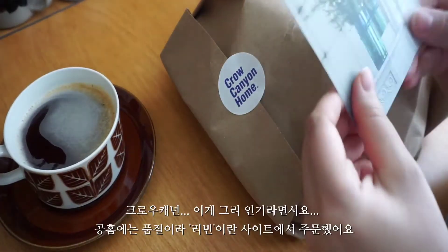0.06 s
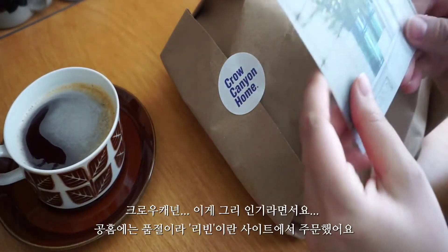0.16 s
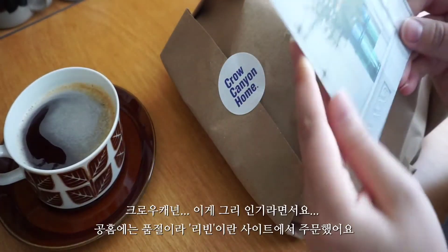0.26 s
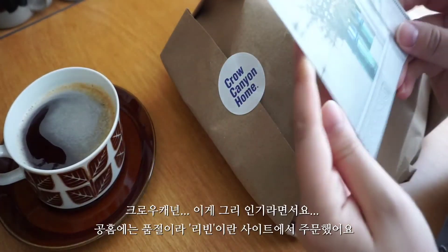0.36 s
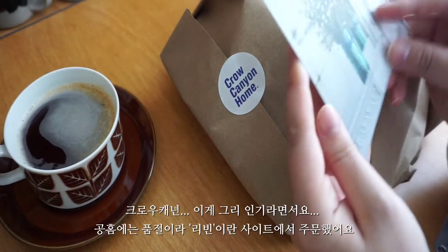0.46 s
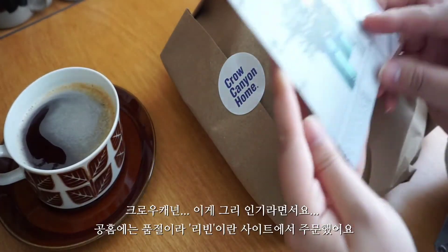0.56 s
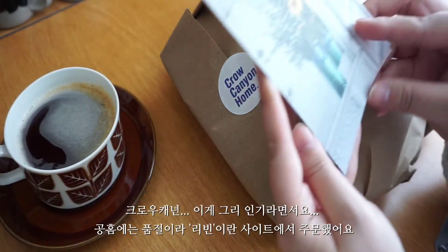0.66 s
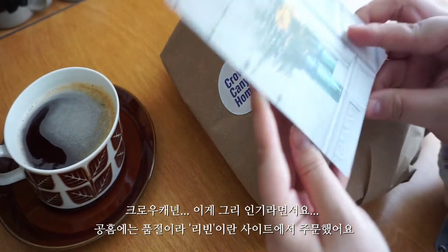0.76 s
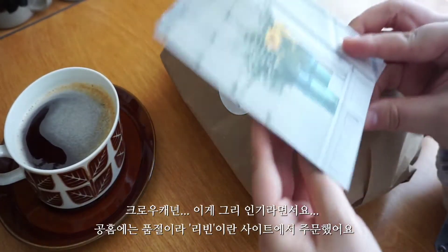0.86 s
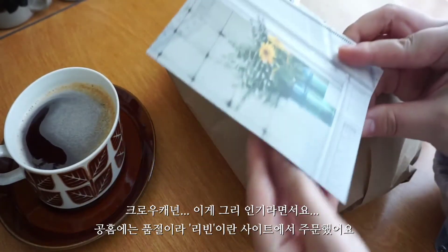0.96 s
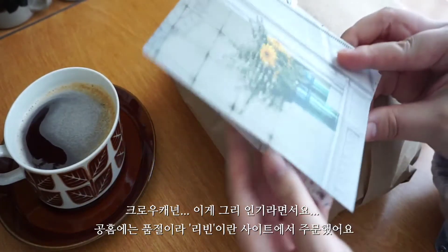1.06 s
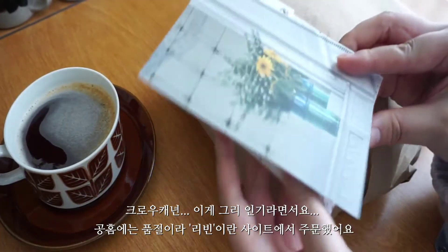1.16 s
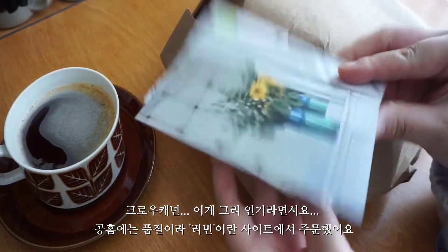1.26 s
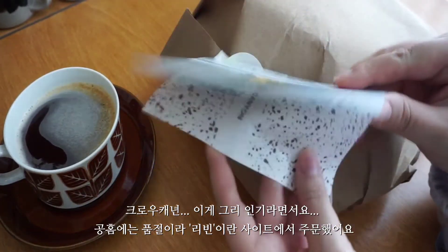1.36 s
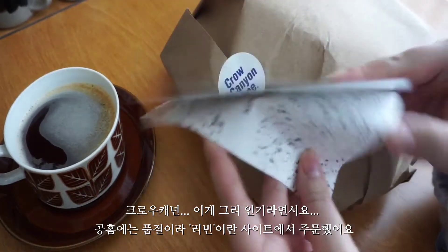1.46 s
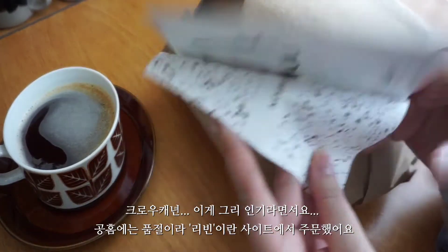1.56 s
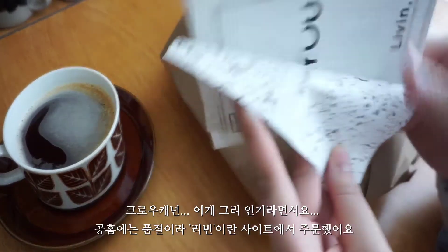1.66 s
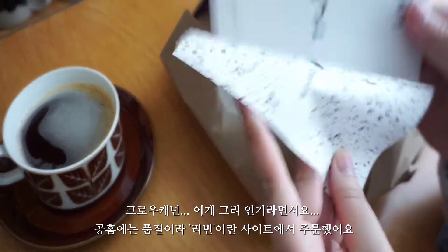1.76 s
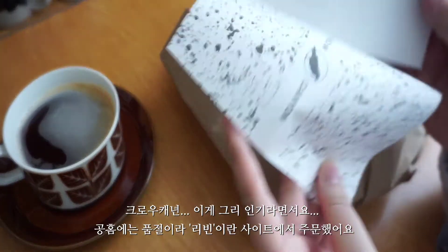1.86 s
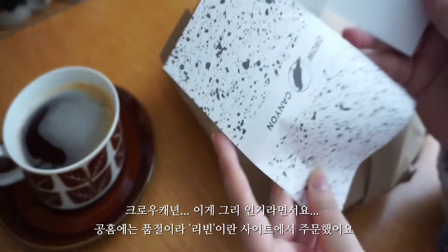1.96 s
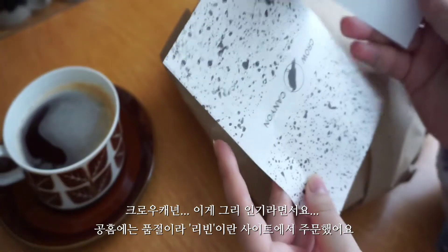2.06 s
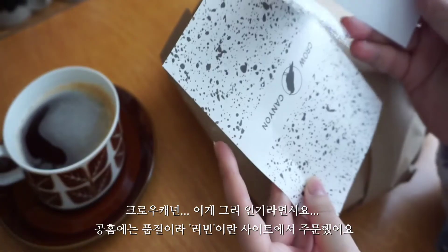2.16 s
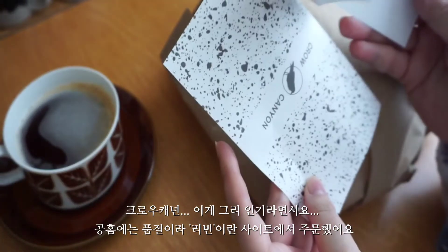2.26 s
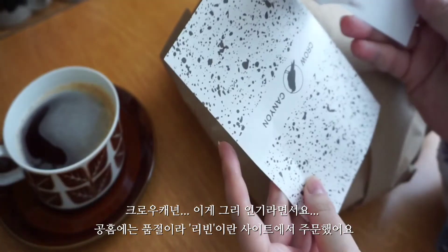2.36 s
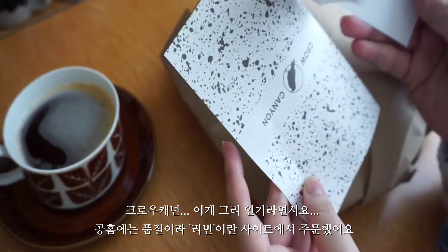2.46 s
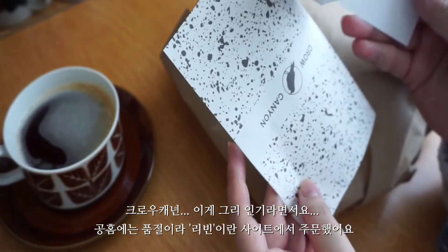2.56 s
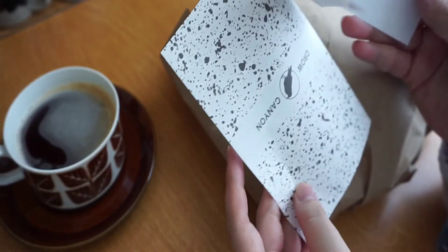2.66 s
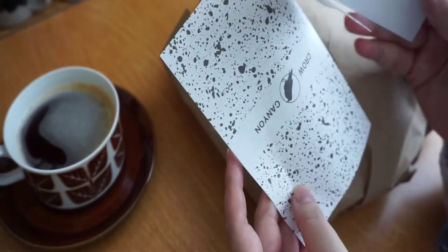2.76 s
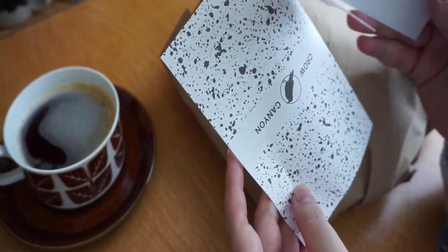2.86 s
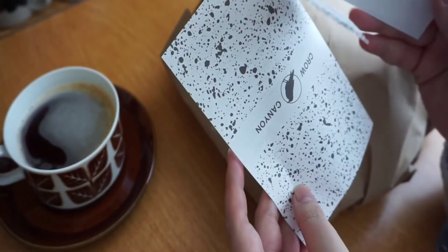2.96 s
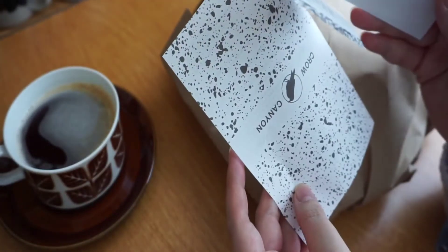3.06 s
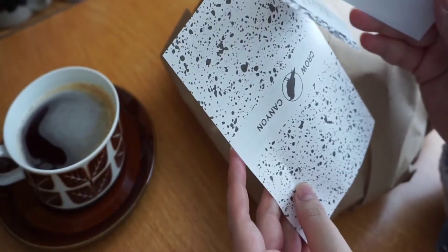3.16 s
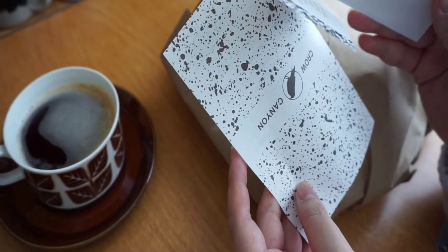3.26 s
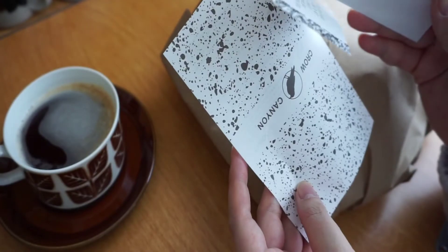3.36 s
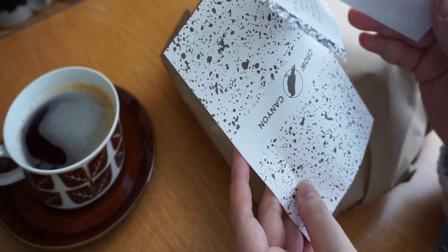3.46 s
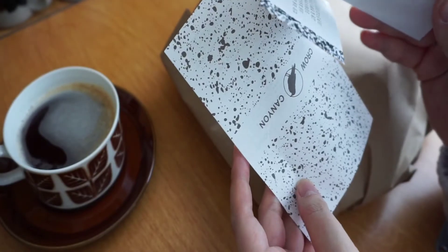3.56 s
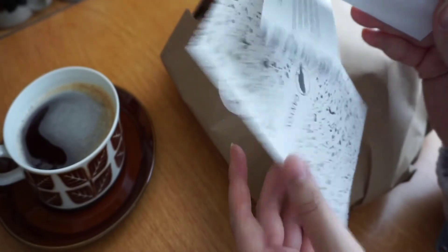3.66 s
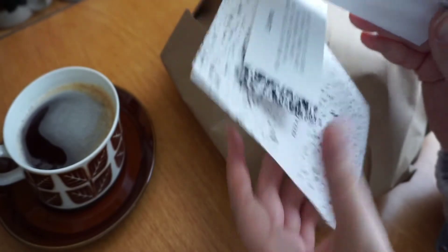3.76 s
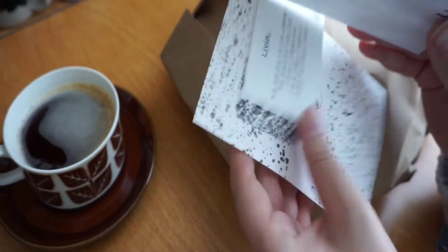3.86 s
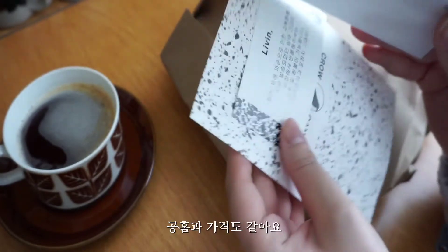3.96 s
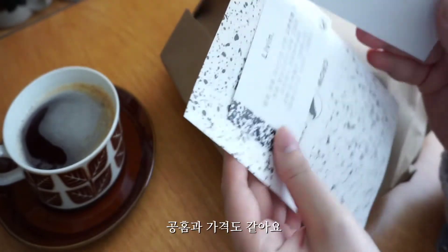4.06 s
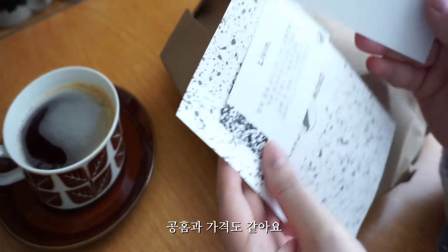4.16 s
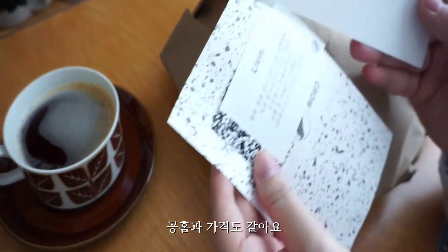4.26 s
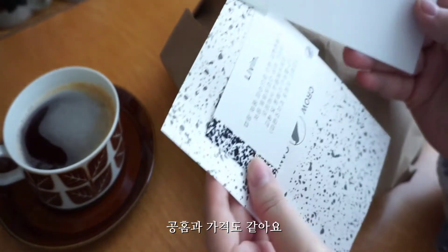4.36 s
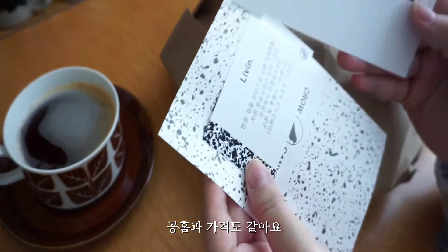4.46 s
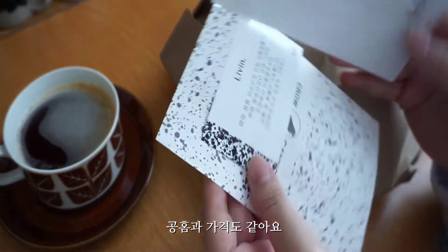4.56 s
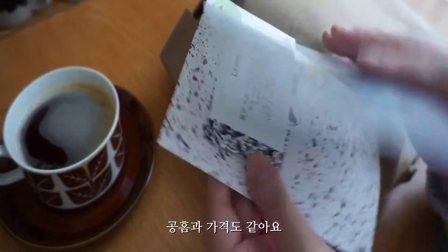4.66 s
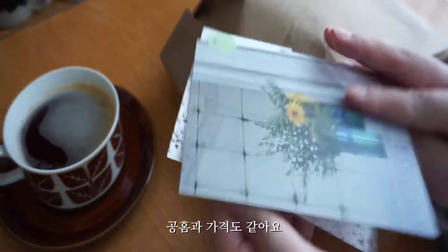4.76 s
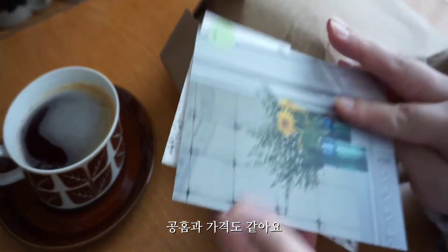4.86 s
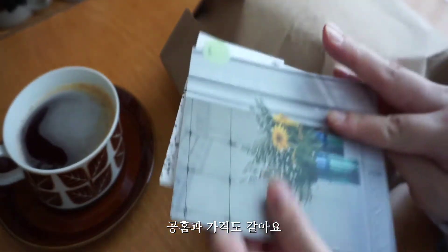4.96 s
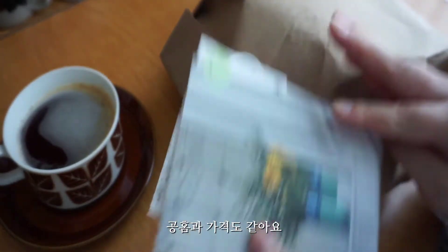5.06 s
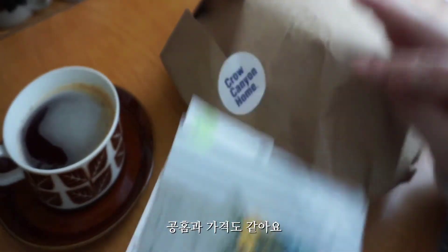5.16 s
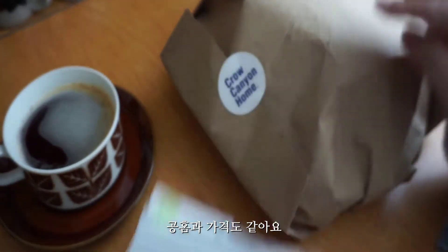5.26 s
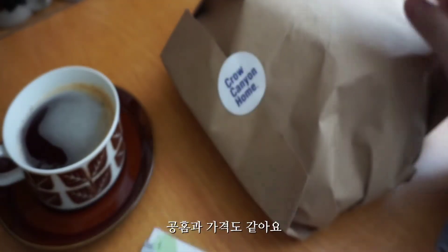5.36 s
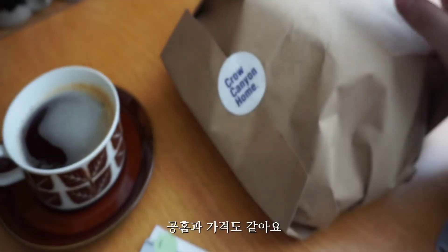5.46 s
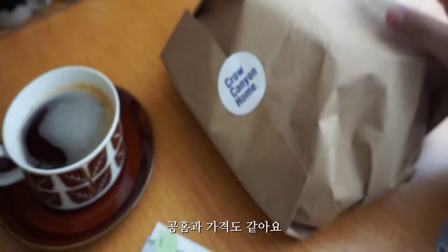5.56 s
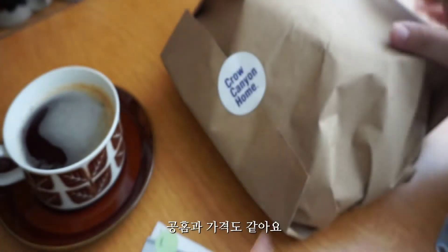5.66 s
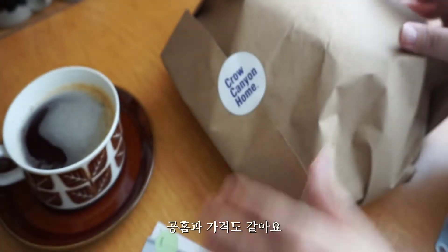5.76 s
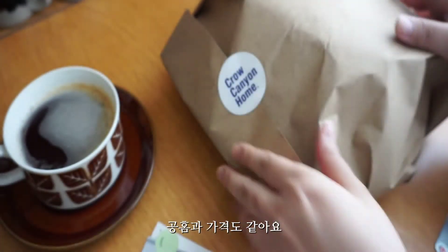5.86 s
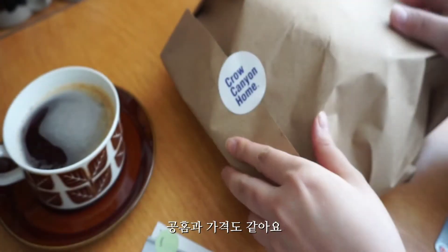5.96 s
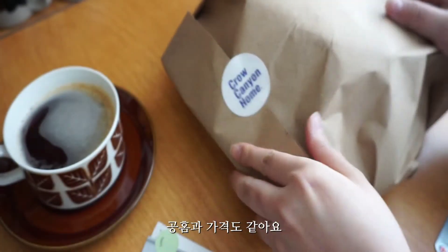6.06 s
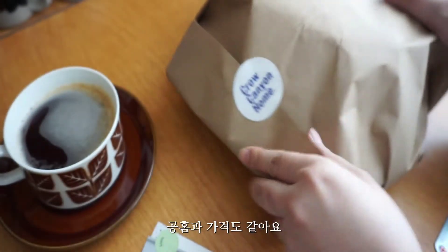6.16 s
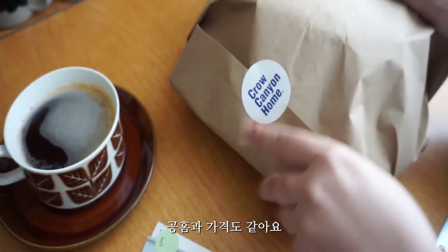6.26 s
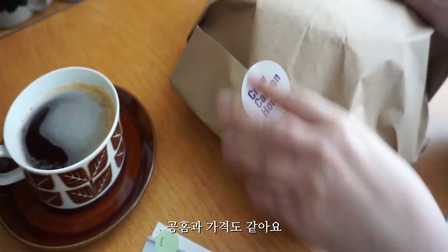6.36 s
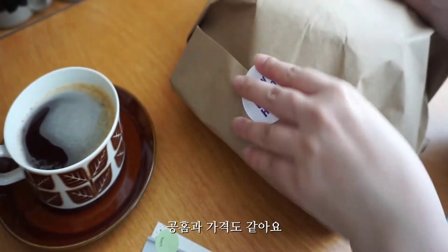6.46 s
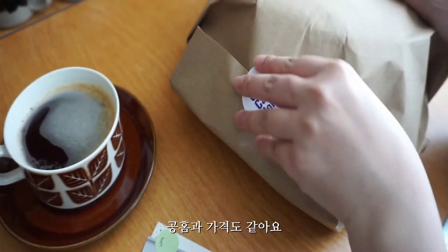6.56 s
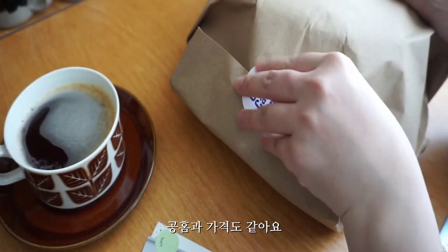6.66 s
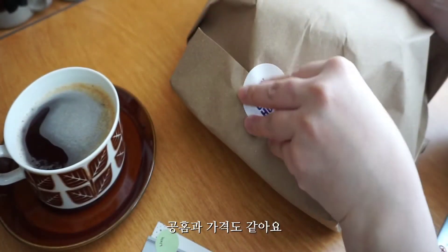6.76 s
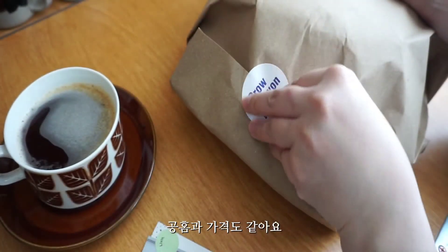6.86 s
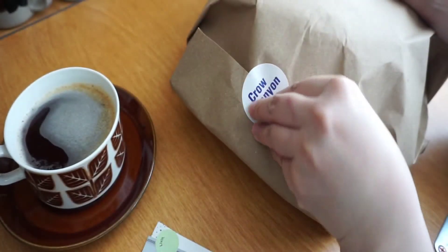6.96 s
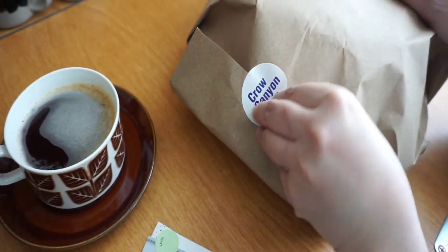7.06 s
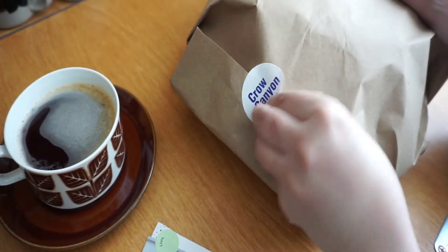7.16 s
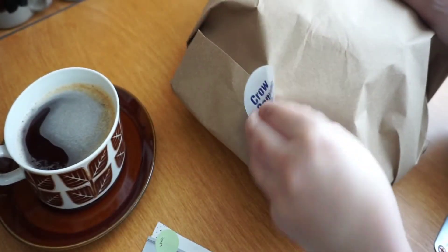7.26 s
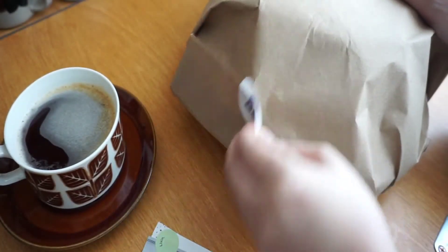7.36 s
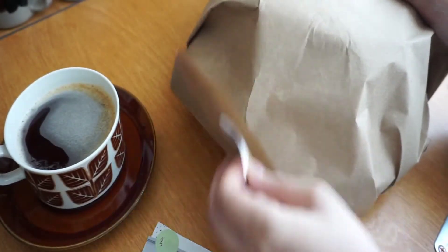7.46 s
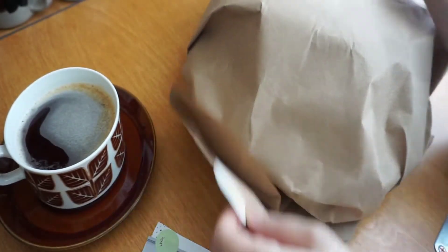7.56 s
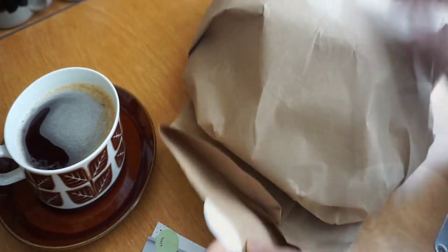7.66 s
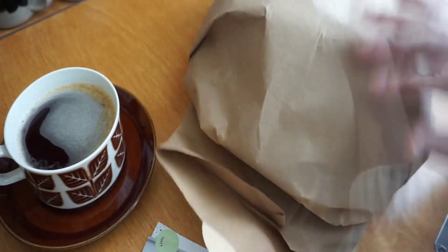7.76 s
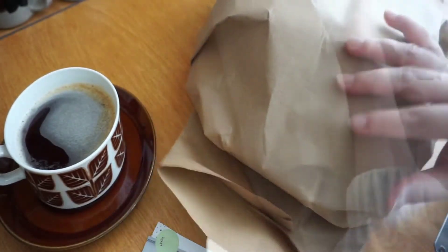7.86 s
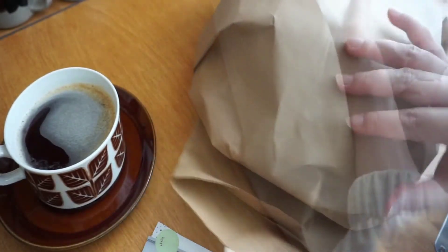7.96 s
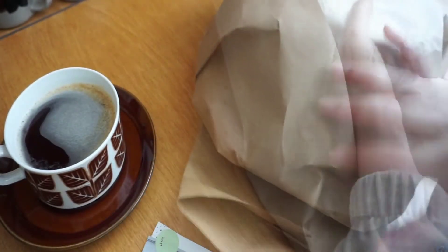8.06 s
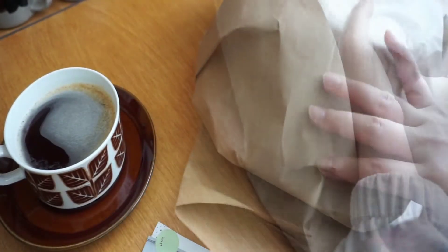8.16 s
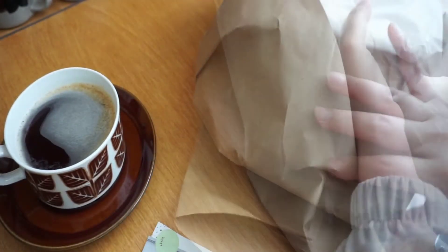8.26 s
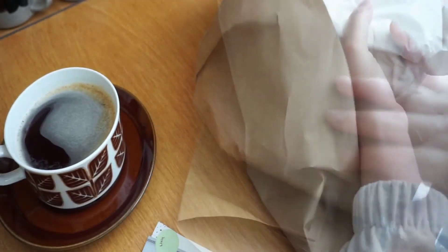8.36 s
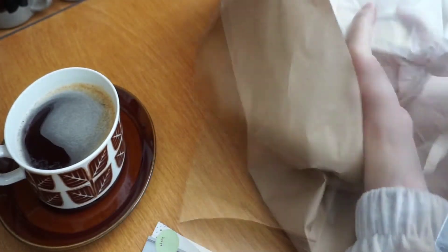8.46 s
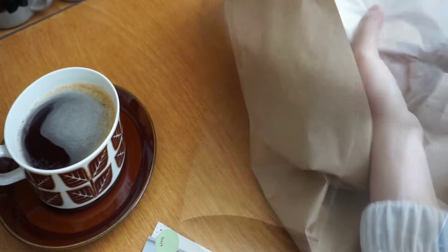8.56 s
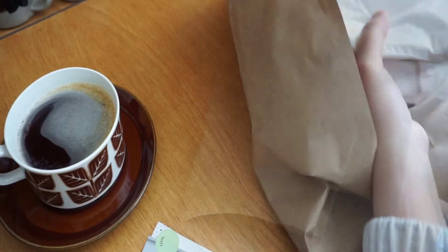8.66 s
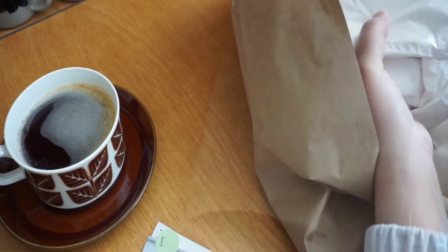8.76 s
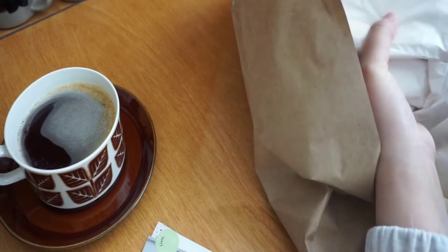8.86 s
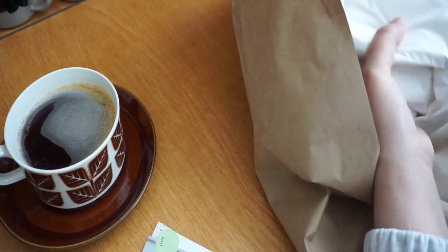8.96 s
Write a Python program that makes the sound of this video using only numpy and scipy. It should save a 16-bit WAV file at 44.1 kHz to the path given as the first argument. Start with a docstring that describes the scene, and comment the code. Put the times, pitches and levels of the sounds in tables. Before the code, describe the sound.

Stiff cards slide and flick in someone's hands, then a sticker is peeled off a crackling paper bag that is pulled open.

```python
"""Stiff cards flick and hiss as hands shuffle them at a table in a small quiet room: their faces rub
as they slide, their edges click as they slip. Then the hands peel the sticker off a paper bag and
pull it open. The bag crackles, its creases snap and its panels pop over the air inside.
A camera's two microphones hear it close up, from just above the table."""
import sys
import numpy as np
from scipy import signal
from scipy.fft import rfft, irfft
from scipy.io import wavfile
from scipy.ndimage import uniform_filter1d

SR = 44100
rng = np.random.default_rng(int(sys.argv[2]) if len(sys.argv) > 2 else 0)


def waveform_to_disk(signal):
    """Save audio, clipped to [-1, 1], as 16-bit WAV at the path in sys.argv[1]."""
    frames = np.transpose(np.atleast_2d(signal))
    scaled = np.clip(frames, -1, 1) * 32767
    samples = np.round(scaled).astype(np.int16)
    wavfile.write(sys.argv[1], SR, samples)


N = 396900  # 9 s
HAND_CLOCK = np.arange(0, N, 64)  # hand movements are slow: one point every 64 samples


def amp(db):
    """Decibels to gain."""
    return 10 ** (np.asarray(db) / 20)


def unit(x):
    """Scales to rms 1."""
    return x / np.sqrt(np.mean(x ** 2) + 1e-20)


def bins(size):
    """The frequencies of a spectrum, in Hz."""
    return np.fft.rfftfreq(size, 1 / SR)


def read(points, hz):
    """Reads a table on a log-frequency axis."""
    freq_hz, value = np.transpose(points)
    return np.interp(np.log(hz + 1), np.log(freq_hz + 1), value)


def shaped(x, gain):
    """Filters by a gain for each frequency."""
    return irfft(rfft(x) * gain, x.shape[-1])


def causal(db):
    """A response with this colour that rings only after the blow."""
    cepstrum = irfft(db * np.log(10) / 20)
    half = len(cepstrum) // 2
    cepstrum[1:half] *= 2
    cepstrum[half + 1:] = 0
    return np.exp(rfft(cepstrum))


def bump(hz, centre_hz, width_hz):
    """A resonance peak of height 1."""
    return 1 / (1 + (2 * (hz - centre_hz) / width_hz) ** 2)


def colour_of(spectrum, modes, hz):
    """A broad spectrum with its resonances, in dB."""
    return read(spectrum, hz) + sum(db * bump(hz, centre, width) for centre, width, db in modes)


# How alike close paper sounds at the two microphones, 0 to 1: freq_hz, likeness
PAPER_LIKENESS = [(300, 0.96), (1000, 0.68), (3000, 0.46), (9000, 0.21)]
def mic_pair(x, likeness=PAPER_LIKENESS):
    """Two unrelated signals become left and right, alike in the bass."""
    shared, separate = rfft(x)
    same = read(likeness, bins(x.shape[1]))
    left = same * shared + np.sqrt(1 - same ** 2) * separate
    return irfft(np.array([left, shared]), x.shape[1])


# Still air in the room, giving way to microphone hiss in the treble: freq_hz, level_db
ROOM_TONE_SPECTRUM = [(13, -53), (22, -35), (48, 4), (81, -8), (139, -5), (163, -11), (253, -3.5),
                      (346, -12), (461, -10), (498, -14), (11000, -27.5), (14300, -90), (22000, -120)]
# Both microphones share the air, but each has its own hiss: freq_hz, likeness
ROOM_TONE_LIKENESS = [(80, 0.95), (250, 0.59), (700, 0)]
def room_tone(air_db=-56.5, drone_hz=58.7, drone_width_hz=12, drone_db=-66):
    """Still room air, a low drone from the building and microphone hiss."""
    hz = bins(N)
    noise = mic_pair(rng.standard_normal((2, N)), ROOM_TONE_LIKENESS)
    air = unit(shaped(noise, amp(read(ROOM_TONE_SPECTRUM, hz))))
    drone = unit(shaped(rng.standard_normal(N), bump(hz, drone_hz, drone_width_hz) ** 2))
    return amp(air_db) * air + amp(drone_db) * drone


# The small room's decay, heard from the table: freq_hz, t60_s
ROOM_DECAY = [(150, 0.66), (1000, 0.51), (4000, 0.26), (10000, 0.42)]
def room_echo(x, early_db=-15.5, early_s=0.004, tail_db=-13, tail_rise_s=0.0089):
    """Table and body throw the sound back at once; the walls add a short tail."""
    t = np.arange(SR * 3 // 4) / SR
    hz, frame_s, noise = signal.stft(rng.standard_normal((2, len(t))), SR, nperseg=256)
    decay = amp(-60 * frame_s / read(ROOM_DECAY, hz)[:, None])
    tail = signal.istft(noise * decay, SR, nperseg=256)[1][:, :len(t)]
    tail *= np.clip(t / tail_rise_s, 0, 1)
    early = rng.standard_normal(tail.shape) * (rng.random(tail.shape) < .06)  # sparse reflections
    early *= (t > .004) * np.exp(-t / early_s)
    echo = mic_pair(amp(tail_db) * unit(tail) + amp(early_db) * unit(early)) / np.sqrt(len(t))
    return signal.fftconvolve(x, echo, axes=1)[:, :N]


def friction(patchy_db=2.5, judder_db=1.5):
    """Fibres drag over fibres; the contact judders and its colour shifts as the sheet bends."""
    noise = signal.stft(mic_pair(rng.standard_normal((2, N))), nperseg=512)[2]
    patches = uniform_filter1d(rng.standard_normal(noise.shape[1:]), size=7, axis=0)  # across frequency
    patches = unit(uniform_filter1d(patches, size=10, axis=1))  # across time
    judder = unit(uniform_filter1d(rng.standard_normal(noise.shape[2]), size=3))
    contact = amp(patchy_db * patches + judder_db * judder)
    return unit(signal.istft(noise * contact, nperseg=512)[1][:, :N])


def buckle(give_s, flutter_db=-4, first_slip=5.8, flutter_s=0.0071, travel_s=.00012, size=4096):
    """A crease gives in a run of tiny slips; bending waves then flutter through the sheet."""
    t = np.arange(size) / SR
    slips = rng.standard_normal((2, size)) * np.exp(-(t / give_s) ** 2)
    slips[0, 0] = first_slip
    slips /= np.linalg.norm(slips, axis=1, keepdims=True)
    flutter = 0.089 * amp(flutter_db) * rng.standard_normal((2, size))
    flutter *= np.exp(-t / (flutter_s + give_s / 2))
    # bending waves disperse: the treble arrives first; travel_s holds at 1 kHz
    dispersion = np.exp(-4j * np.pi * travel_s * np.sqrt(1000 * bins(size)))
    return shaped(mic_pair(slips + flutter), dispersion)


def crackle(per_s=480, spread_db=4.0, ring_db=13, pitches=32, size=2048):
    """Countless small creases of many pitches give way at random."""
    out, hz = np.zeros((2, N)), bins(size)
    for ring_hz in np.geomspace(250, 9000, pitches):
        blow = buckle(give_s=rng.uniform(0.00012, 0.0022), size=size)
        grain = shaped(blow, causal(ring_db * bump(hz, ring_hz, 0.32 * ring_hz)))
        onsets = rng.random(N) < per_s / pitches / SR
        train = onsets * amp(spread_db * np.minimum(rng.exponential(1, N), 3))
        out += signal.oaconvolve(train[None], unit(grain), axes=1)[:, :N]
    return unit(out)


# Where paper sounds hollow, full and crisp: body_hz, middle_hz, edge_hz
ZONE_CENTRES = [400, 1700, 7000]
def zones(hz):
    """Three overlapping ranges of a paper sound: body, middle, edge."""
    return np.array([read(list(zip(ZONE_CENTRES, row)), hz) for row in np.eye(3)])


def sheet(drive, colour_db, gains):
    """A driven sheet sounds its body, middle and edge, each with its own gain."""
    return sum(gain * unit(shaped(drive, zone * amp(colour_db)))
               for zone, gain in zip(zones(bins(N)), gains))


def snaps(rows, spectrum, modes, ring_db, trim_db, flutter_db, wide_db_per_octave=4.0, size=4096):
    """Each snap rings its own panel; wide panels sound hollow, tight creases crisp."""
    out, hz = np.zeros((2, N + size)), bins(size)
    zone, paper_db = zones(hz), colour_of(spectrum, modes, hz)
    for start_s, level_db, body_db, edge_db, ring_hz, give_s in rows:
        # wide panels, ringing below 1 kHz, pump the air better
        peak_db = ring_db + wide_db_per_octave * np.log2(max(1000 / ring_hz, 1))
        colour_db = paper_db + peak_db * bump(hz, ring_hz, width_hz=0.34 * ring_hz + 40)
        blow = buckle(max(give_s, 1e-4), flutter_db)
        wanted_db = level_db + trim_db + np.array([body_db, 0, edge_db])
        for _ in range(2):  # a range's level is its energy spread over 10 ms
            ranges = shaped(blow[:, None], zone * amp(colour_db))
            power = (ranges ** 2).sum(2).mean(0) / (SR / 100)
            colour_db = colour_db + (wanted_db - 10 * np.log10(power)) @ zone
        start = round(start_s * SR)
        out[:, start:start + size] += shaped(blow, causal(colour_db))
    return out[:, :N]


def stroke(start_s, length_s, effort_db, swell_db, rise_db_per_s=583, fade_db_per_s=385):
    """The power of one hand movement: it sets in, swells or eases, and stops."""
    t = HAND_CLOCK / SR - start_s
    progress = np.clip(t / length_s, 0, 1)
    resting_db = rise_db_per_s * np.maximum(-t, 0) + fade_db_per_s * np.maximum(t - length_s, 0)
    return amp(effort_db + swell_db * (progress - .5) - resting_db) ** 2


def envelope(power):
    """Power on the hand clock to a gain for each sample."""
    return np.interp(np.arange(N), HAND_CLOCK, np.sqrt(power))


# The note of one card on another, level relative to the effort: time_s, pitch_hz, level_db
CARD_NOTE_PATH = [(.6, 2310, 1), (.72, 2160, 3.5), (.84, 2300, -0.5), (.93, 3140, 4.5), (1.05, 2980, 9),
                  (1.3, 2900, -17), (1.5, 2340, 1), (2, 2750, -53), (4.8, 3080, -18), (5.02, 3720, 5.5),
                  (5.1, 3280, 8), (5.2, 3430, -41)]
def card_note(width_hz=950):
    """Friction excites a resonance of the sliding card that shifts with the grip."""
    time_s, *columns = np.transpose(CARD_NOTE_PATH)
    pitch_hz, level_db = [np.interp(np.arange(N) / SR, time_s, column) for column in columns]
    carrier = np.exp(2j * np.pi * np.cumsum(pitch_hz) / SR)
    pole = np.exp(-np.pi * width_hz / SR)
    # shift down, low-pass, shift back: a resonance that follows the pitch
    lowered = friction(patchy_db=0.0) / carrier
    ring = carrier * signal.lfilter([(1 - pole) ** 2], [1, -2 * pole, pole * pole], lowered)
    return amp(level_db) * unit(ring.real)


# The colour of stiff card, close up: freq_hz, level_db
CARD_SPECTRUM = [(53, -5), (90, -13), (326, -8), (572, -10), (1410, -8.5), (2430, -6), (11000, -7),
                 (14300, -121), (22000, -120)]
# A card slides over another or under the fingers; edge is relative to effort:
# start_s, length_s, effort_db, swell_db, edge_db
SLIDE_STROKES = [(0, 0.19, -54.5, -7.5, 8.5), (0.213, 0.18, -66, -6, 14.5), (0.455, 0.15, -64.5, 4, 11.5),
                 (0.627, 0.39, -65, -1, 2), (0.853, 0.12, -49, 5.5, 3.5), (1.025, 0.023, -46.5, 3, 6),
                 (1.093, 0.047, -50, 4, 1), (1.195, 0.16, -55.5, 10, 6), (1.378, 0.058, -39.5, 4.5, 7.5),
                 (1.482, 0.055, -35.5, 1.5, 8), (1.577, 0.089, -41.5, 7, -0.5), (1.717, 0.083, -43, 0.5, 3),
                 (1.919, 0.16, -55.5, -20, 1), (2.128, 0.025, -56, -4, 6.5), (2.71, 0.14, -62, 9.5, 0),
                 (2.867, 0.075, -73, -8, 2), (3.705, 0.25, -61.5, -4.5, 7.5), (3.985, 0.095, -48.5, 1, -8),
                 (4.107, 0.38, -64, -10, 4.5), (4.618, 0.27, -61.5, 21, 8), (4.913, .12, -51, -1, 1),
                 (5.071, 0.034, -40.5, 1.5, 5), (5.16, 0.24, -51.5, -5, -1), (5.468, 0.2, -53, 4.5, 1.5)]
def card_slides(hiss, grains, crackle_share=0.19, holding_db=-88, gentle_db=-60, trim_db=-1):
    """Friction and a little crackle sound through the cards; brisk slides are brighter."""
    powers = np.array([stroke(*row[:4]) for row in SLIDE_STROKES])
    *_, edge_db = np.transpose(SLIDE_STROKES)
    holding = amp(holding_db) ** 2  # fingers merely holding a card
    effort = envelope(powers.sum(0) + holding)
    body = amp(gentle_db) * (effort / amp(gentle_db)) ** 0.49  # gains only part of any further effort
    middle = amp(trim_db) * effort
    edge = amp(trim_db) * envelope(amp(edge_db) ** 2 @ powers + holding)
    drive = np.sqrt(1 - crackle_share) * hiss + np.sqrt(crackle_share) * grains
    return effort * card_note() + sheet(drive, read(CARD_SPECTRUM, bins(N)), (body, middle, edge))


# Resonances of a flicked card: pitch_hz, width_hz, boost_db
FLICK_MODES = [(420, 200, 7), (944, 57, 9.5), (1854, 52, 4.5), (2630, 120, 4.5)]
# A low thump as the sound begins, then card edges flicking near the microphones; body and edge are relative to
# level: # start_s, level_db, body_db, edge_db, ring_hz, give_s
EDGE_FLICKS = [(.004, -37.5, 1, -6.5, 165, 0.0046), (.411, -41.5, -7.5, 0.5, 1030, 0.012),
               (.9134, -31.5, -14, -1, 3130, 0.0016), (1.456, -37.5, -4, -8, 3300, 0.0013),
               (1.6122, -32.5, -5, 9, 4450, 0.0037), (1.6166, -28.5, -5.5, 1.5, 584, 0.0024),
               (1.7645, -38, -10, -8, 2240, 0.00043), (1.7716, -41, -30, 8, 3170, 0.0044),
               (1.818, -39, 2.5, 0, 162, 0.00094), (1.8842, -42.5, 7.5, -2, 144, 0.005),
               (2.166, -47, -5, -8, 5470, .0026), (2.1743, -30, -11, -10.5, 3120, 0.0061),
               (2.752, -57, 5, -16, 900, 0.0065), (3.789, -30.5, -10, 1.5, 2750, 0.0066),
               (3.885, -39, -5.5, -2.5, 2480, 0.0053), (3.9168, -32, -4, -1.5, 436, .0028),
               (3.941, -38, -10, -4, 3930, .002), (3.951, -38.5, -17, -1, 2120, 0.0015),
               (3.992, -41.5, -4, -4, 990, 0.0063), (4.001, -41, -4, -22, 1050, 0.0036),
               (4.038, -39, -5.5, -2, 494, 0.01), (4.0444, -27.5, -13.5, -4.5, 800, 0.00016),
               (4.889, -32, -4.5, 0.5, 610, 0.00042), (4.893, -50.5, 10, -8, 105, 0.0066),
               (4.952, -32.5, -14, -11, 2430, 0.0023), (4.982, -38, -10.5, -5.5, 4020, .004),
               (5.128, -36, -9, -5, 1140, 0.012), (5.298, -38, -6, 3, 4850, 0.0091),
               (5.3752, -34, -5, -2, 1020, 0.0051), (5.467, -37.5, -15, -2, 1700, 0.00021)]
def card_flicks():
    """An edge slips free with a click that rings the card."""
    return snaps(EDGE_FLICKS, CARD_SPECTRUM, FLICK_MODES, ring_db=11.0, trim_db=0.6, flutter_db=-4.0)


def bag_flexing(per_s=45, decay_cycles=0.36, pitches=12, size=2048):
    """Broad panels of the bag flip in and out with dull, quickly damped knocks."""
    out, t = np.zeros(N), np.arange(size) / SR
    for hz in np.geomspace(240, 560, pitches):
        knock = unit(np.sin(2 * np.pi * hz * t) * t * np.exp(-hz * t / decay_cycles))
        flips = (rng.random(N) < per_s / pitches / SR) * rng.uniform(-0.85, 1, N)
        out += signal.oaconvolve(flips, knock)[:N]
    return unit(out)


# The colour of the paper bag, close up: freq_hz, level_db
BAG_SPECTRUM = [(24, -70), (40, -14), (100, -8.5), (136, -8.5), (193, -5), (364, -4.5), (611, -4.5),
                (1640, -11), (2230, -9), (11000, -16), (14300, -112), (22000, -120)]
# Resonances of the air in the bag and its broad panels: pitch_hz, width_hz, boost_db
BAG_MODES = [(138.6, 14, 9.5), (371.4, 32, 7.5), (763, 41, 4), (900, 42, 2.5)]
# Hands press, peel and pull the bag at the table; body and edge are relative to effort:
# start_s, length_s, effort_db, swell_db, body_db, edge_db, crackle_share
PULL_STROKES = [(5.734, 0.32, -51, 13.5, -20, 7.5, 0.07), (5.994, 0.031, -39.5, 0.5, 2, 3, 0.25),
                (6.095, 0.21, -40, 3.5, -4.5, 3, 0.2), (6.317, 0.12, -39, 3.5, -2.5, -0.5, 0.15),
                (6.44, 0.26, -43, 9.5, -7, 0.5, 0.01), (6.673, 0.072, -38, -1.5, -3, -8, 0.4),
                (6.788, 0.047, -42.5, 3.5, -11, -3, 0.13), (6.876, 0.29, -47.5, 6.5, -1.5, -2, 0.28),
                (7.211, 0.087, -38.5, -3.5, -4, -3, 0.4), (7.311, 0.04, -35, 2, -0.5, 8.5, 0.87),
                (7.37, 0.047, -38, 5, 3, 9, 0.6), (7.469, 0.19, -38, 6.5, -2, -3.5, 0.15),
                (7.673, 0.22, -38.5, -3, -5, 1, 0.12), (7.872, 0.24, -39, 4.5, -1, -2, 0.2),
                (8.113, 0.56, -33.5, -0.5, -4, -1.5, 0.34), (8.665, 0.18, -31.5, 4, -3, 0, 0.08),
                (8.872, 0.14, -30.5, 1.5, -1, -5.5, 0.48)]
def bag_pulls(hiss, grains, flex_db=-23, trim_db=-1):
    """Friction and crackle sound through the flexing bag; the tearing sticker crackles most."""
    powers = np.array([stroke(*row[:4]) for row in PULL_STROKES])
    *_, body_db, edge_db, shares = np.transpose(PULL_STROKES)
    total = powers.sum(0) + 1e-20
    crackle_share = np.clip(shares @ powers / total, 0, 1)
    drive = envelope(1 - crackle_share) * hiss + envelope(crackle_share) * grains
    drive += amp(flex_db) * bag_flexing()
    body = envelope(amp(body_db + trim_db) ** 2 @ powers)
    middle = amp(trim_db) * envelope(total)
    edge = envelope(amp(edge_db) ** 2 @ powers)
    return sheet(drive, colour_of(BAG_SPECTRUM, BAG_MODES, bins(N)), (body, middle, edge))


# Creases snapping near the microphones; body and edge are relative to level:
# start_s, level_db, body_db, edge_db, ring_hz, give_s
CREASE_SNAPS = [(5.9974, -29, -5.5, -5.5, 2410, 0.0017), (6.0597, -29, 1, -10.5, 1600, 0.00041),
                (6.293, -33, -4, -8, 560, 0.0039), (6.371, -22.5, -7, -3, 3440, 0.0065),
                (6.6529, -26.5, -3, 3.5, 2560, 0.0031), (6.682, -21, -1.5, -9, 790, 0.0049),
                (6.804, -43.5, -5, 10.5, 2580, 0.0028), (7.0134, -32, -2.5, -15.5, 2160, 0.00051),
                (7.2031, -26.5, -11, -2, 2770, 0.00066), (7.2776, -26.5, -5, -2.5, 1000, 0.00027),
                (7.3325, -28, -14, -3, 2970, 0.0015), (7.381, -27, -33, -2, 5170, 0.00046),
                (7.41, -26, -9, 1.5, 2330, 0.0048), (7.4205, -27.5, -18, 0, 4000, 0.0028),
                (7.428, -26, 4, -9, 193, 0.0045), (7.457, -25.5, 0, 0.5, 310, 0.0019),
                (7.464, -26, -3, -2, 780, 0.0053), (7.539, -35.5, -20, 6, 2560, 0.0025),
                (7.723, -27, -2.5, -6, 545, 0.013), (7.796, -26, -11, -10, 1230, .004),
                (7.823, -25, -4.5, -6.5, 2580, 0.014), (7.9865, -22.5, -13.5, -10, 1990, 0.0023),
                (8.0633, -25, -29, -5, 2020, 0.000085), (8.134, -34.5, -6, 1, 5600, .003),
                (8.229, -25, -3.5, 1.5, 3400, 0.0012), (8.235, -25.5, -8.5, -1.5, 2260, 0.013),
                (8.268, -24, -21, -9, 1230, .0007), (8.335, -26, -25, -10, 2680, .0004),
                (8.541, -26.5, -10, 0, 5740, 0.00068), (8.576, -21.5, -9, -6, 2140, 0.0044),
                (8.640, -23, -7, -6.5, 2240, 0.0057), (8.685, -20.5, -14, -11, 2190, 0.0044),
                (8.757, -22.5, -5.5, -10, 1900, 0.016), (8.775, -26.5, -9, -4, 1700, 0.0097),
                (8.884, -28.5, -8, 2.5, 3170, 0.003)]
# Broad panels popping in or out: start_s, level_db, ring_hz
PANEL_POPS = [(5.729, -52.5, 279), (6.152, -46, 350), (6.223, -45, 290), (6.324, -43, 368),
              (6.588, -42, 322), (6.831, -45.5, 340), (7.164, -45, 415), (7.683, -32, 710),
              (8.156, -37.5, 485), (8.353, -35.5, 370), (8.456, -38, 420), (8.907, -37.5, 306)]
def bag_snaps(pop_body_db=10.5, pop_edge_db=-16, pop_give_s=0.0043):
    """Creases snap over the air in the bag; its broad panels pop, hollow and dull."""
    pops = [(start_s, level_db, pop_body_db, pop_edge_db, ring_hz, pop_give_s)
            for start_s, level_db, ring_hz in PANEL_POPS]
    return snaps(CREASE_SNAPS + pops, BAG_SPECTRUM, BAG_MODES, ring_db=4.5, trim_db=-0.3, flutter_db=-3)


# The paper's balance at the microphones, just above the table: freq_hz, left_minus_right_db
MIC_BALANCE = [(400, 0), (1900, -3), (4000, -2.5), (9000, -1)]
def scene(left_lag_s=.00003):
    """Cards, then the bag, lie a little to the right: louder and earlier on that side."""
    hiss, grains, hz = friction(), crackle(), bins(N)
    cards = card_slides(hiss, grains) + card_flicks()
    bag = bag_pulls(hiss, grains) + bag_snaps()
    paper = cards + bag
    lean_db = read(MIC_BALANCE, hz) / 2
    left = amp(lean_db) * np.exp(-2j * np.pi * hz * left_lag_s)
    right = amp(-lean_db)
    return shaped(paper + room_echo(paper), np.array([left, right])) + room_tone()


def record(dry, cutoff_hz=11250):
    """The camera's band limit cuts the top of the treble."""
    lowpass = signal.firwin(401, cutoff_hz, window=("kaiser", 7), fs=SR)
    return signal.oaconvolve(dry, lowpass[None], "same")


dry = scene()
out = record(dry)
waveform_to_disk(out)
```